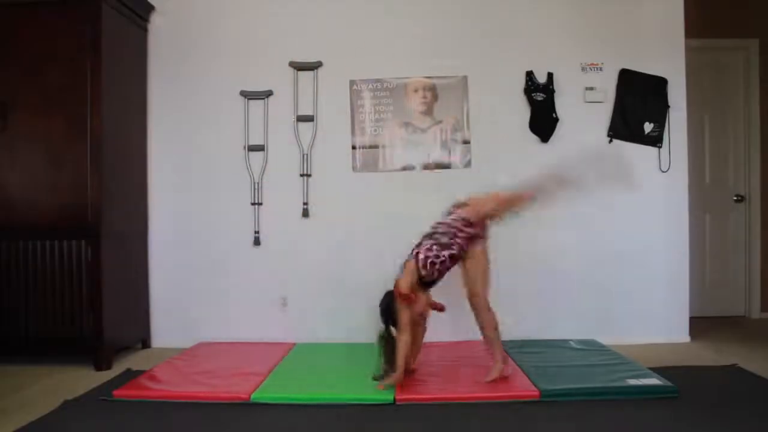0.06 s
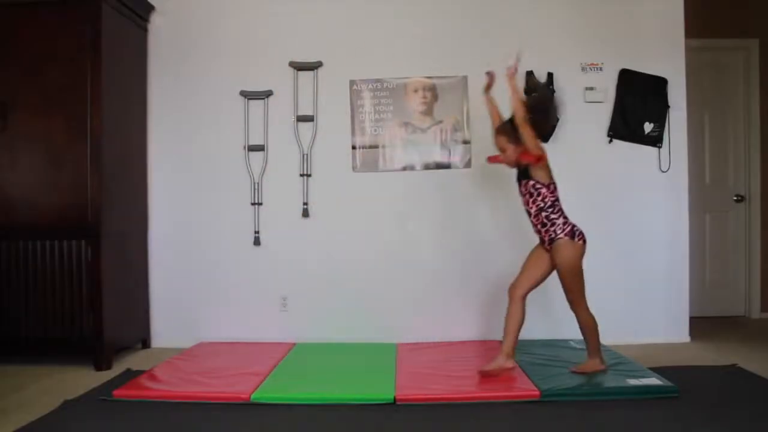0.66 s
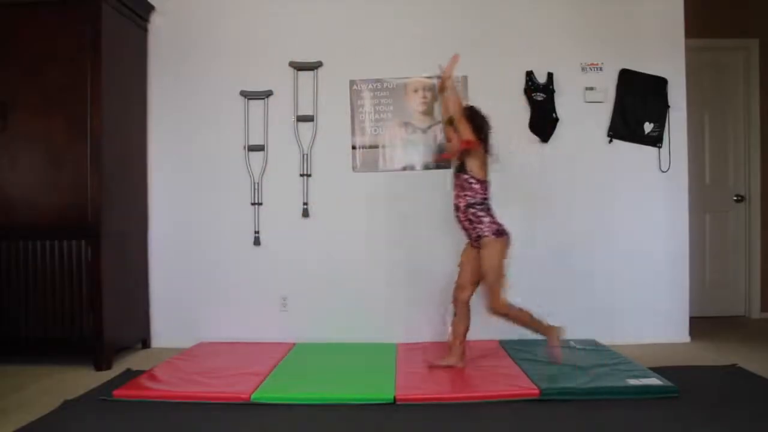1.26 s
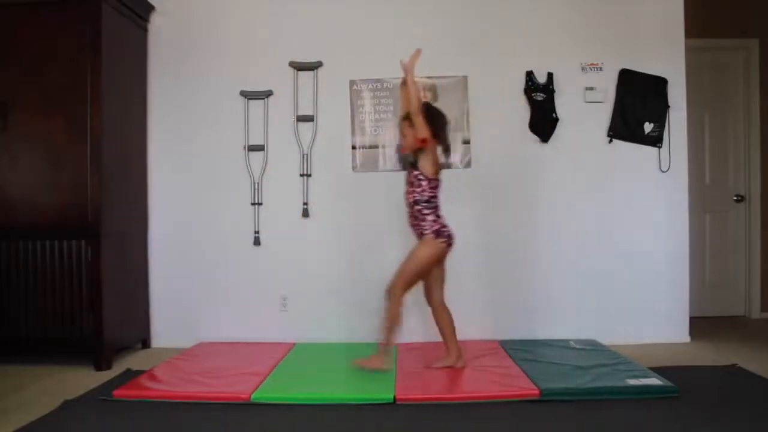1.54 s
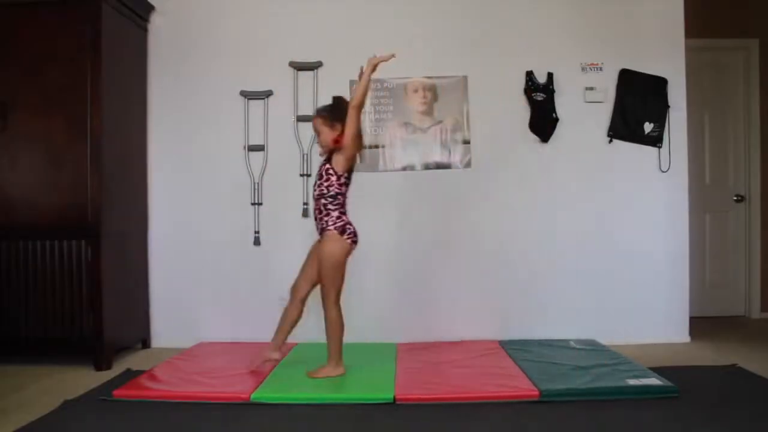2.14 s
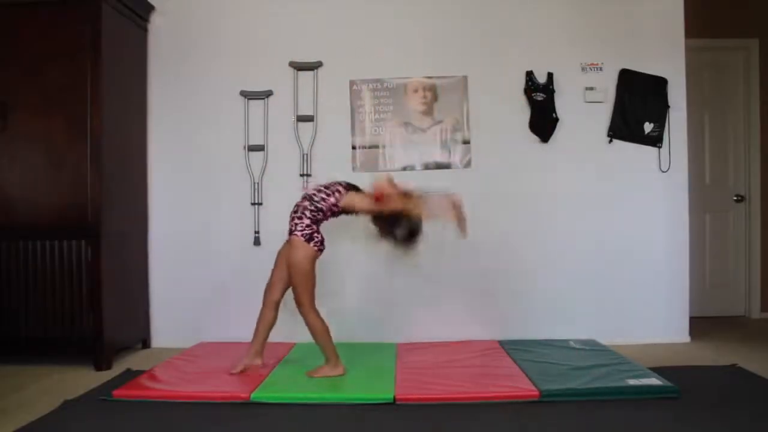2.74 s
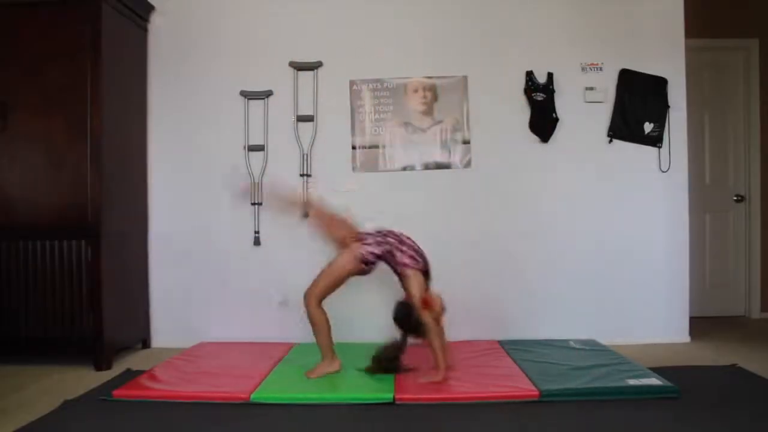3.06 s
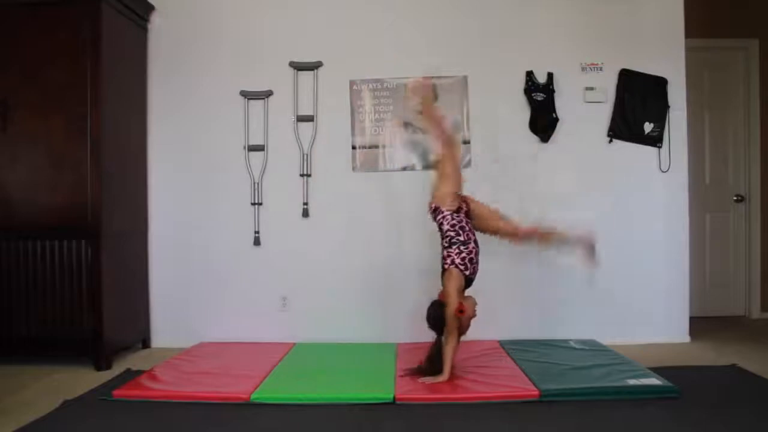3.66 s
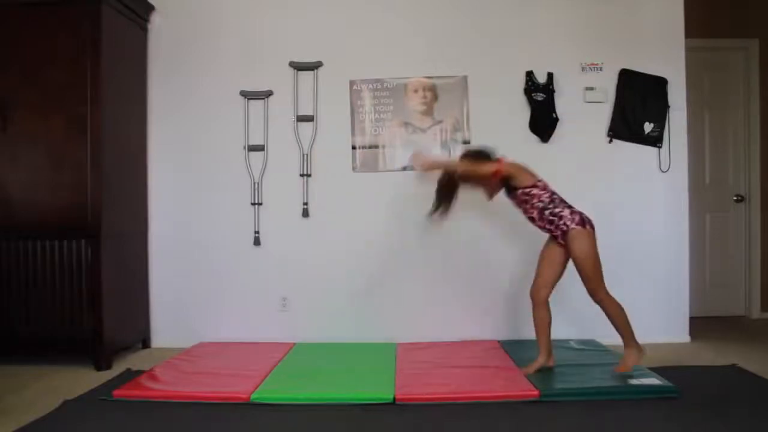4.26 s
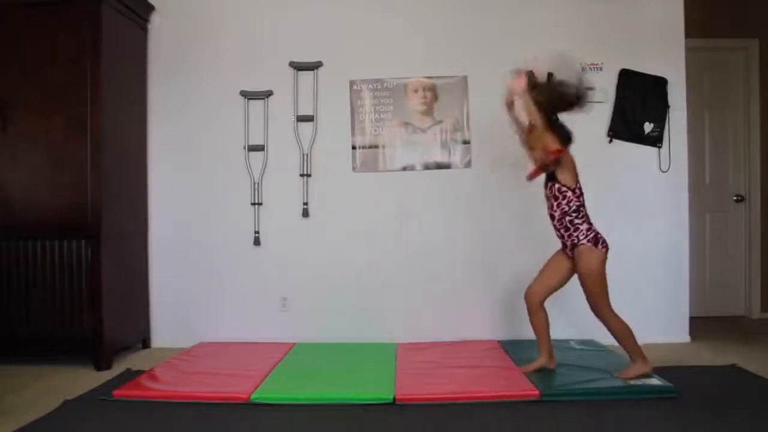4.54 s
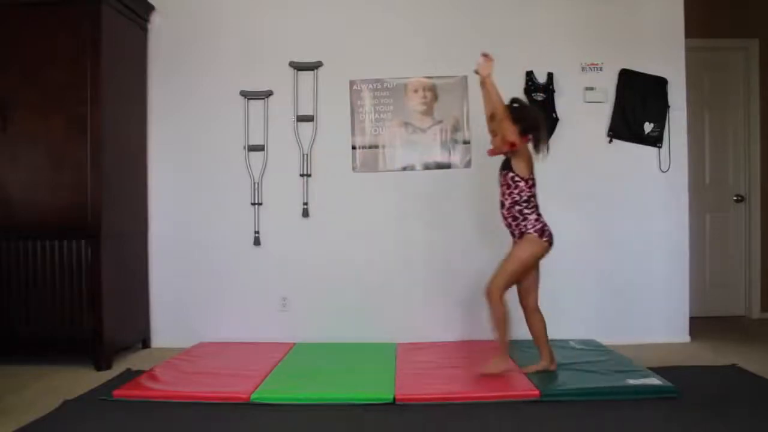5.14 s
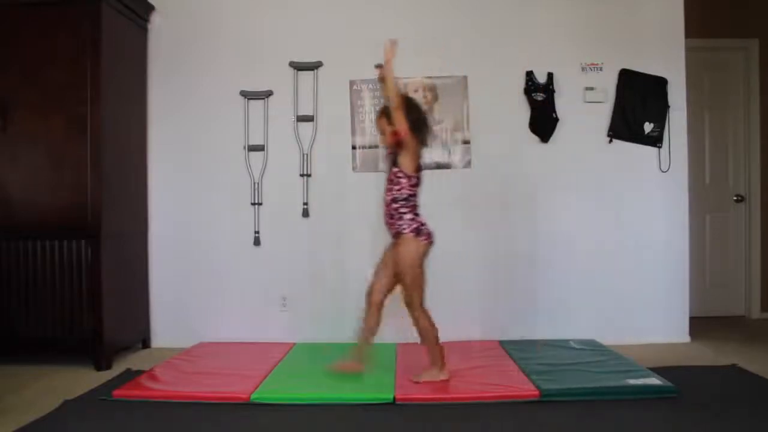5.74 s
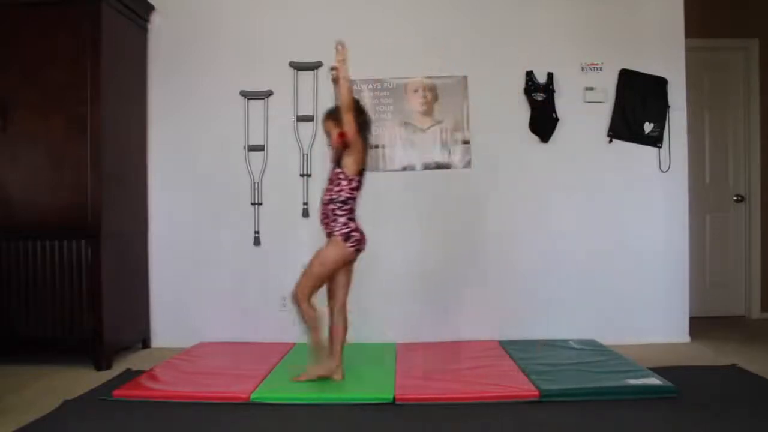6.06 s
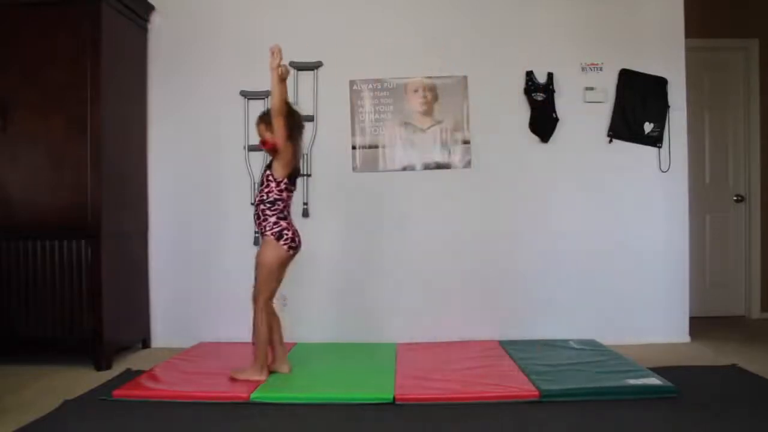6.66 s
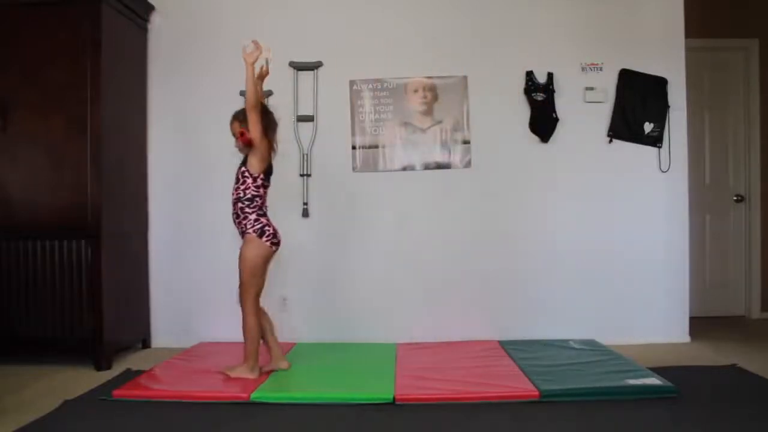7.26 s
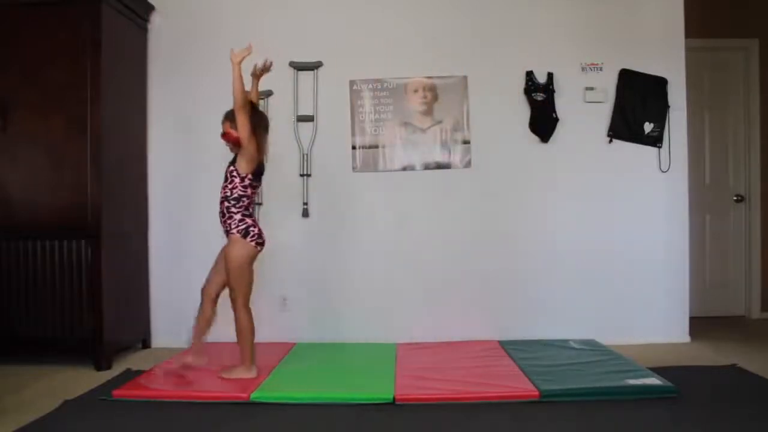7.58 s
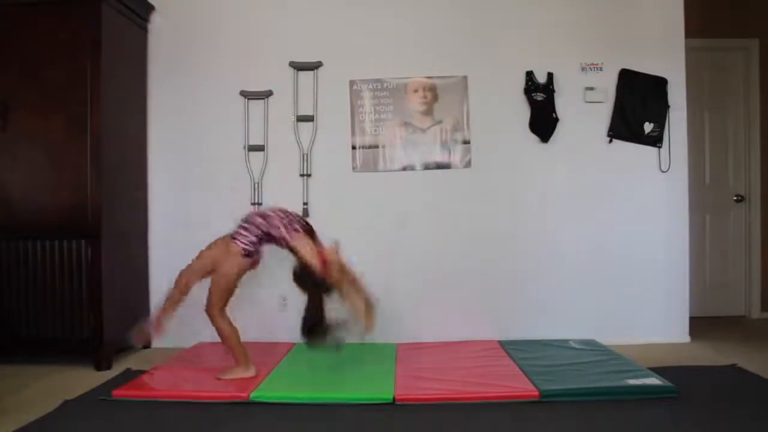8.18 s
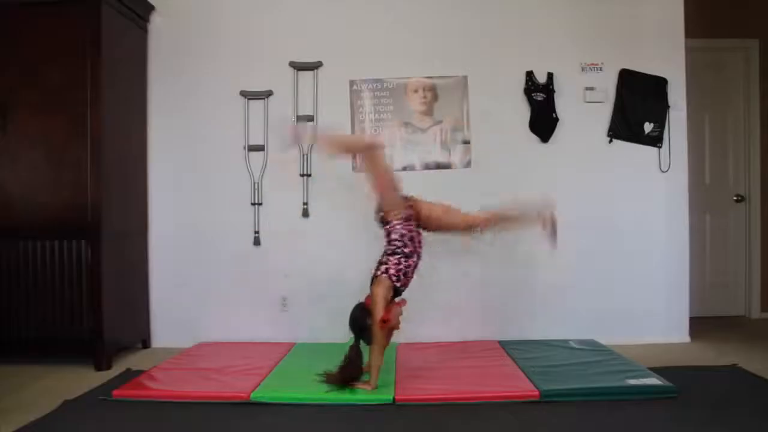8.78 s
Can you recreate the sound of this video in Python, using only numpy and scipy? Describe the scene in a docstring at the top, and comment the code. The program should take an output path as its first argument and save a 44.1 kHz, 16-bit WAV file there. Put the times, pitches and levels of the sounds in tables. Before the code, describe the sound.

A gymnast lands and steps on gym mats in a slightly echoing room, with soft thuds, skin brushing vinyl and one loud smack.

```python
"""A gymnast does walkovers on vinyl-covered foam mats in a bare room. From the start an appliance hums
faintly under the room's hiss. Hands and feet land in clusters: each impact thuds in the foam, pops out
trapped air, crinkles the cover and brushes it with skin. In between, the weight shifts and skin sweeps
or squeaks over the vinyl. Near 5.9 s a flat sole stamps and the mat booms; lighter steps follow to the
end. The walls reverberate after every contact."""
import sys
import numpy as np
from scipy import signal
from scipy.fft import rfft, irfft, next_fast_len
from scipy.io import wavfile

SR = 44100
rng = np.random.default_rng(int(sys.argv[2]) if len(sys.argv) > 2 else 0)


def file_out(sig):
    """Save sig as 16-bit WAV at sys.argv[1]."""
    # one column per channel
    cols = np.atleast_2d(sig).T
    # limit, then scale
    lim = np.clip(cols, -1, 1)
    pcm = np.round(lim * 32767).astype(np.int16)
    wavfile.write(sys.argv[1], SR, pcm)


N = 392931


def amp(db):
    """Amplitude ratio of a level in decibels."""
    return 10 ** (np.asarray(db) / 20)


def unit(x):
    """Normalisation to an rms of 1."""
    return x / np.sqrt(np.mean(x ** 2) + 1e-20)


def along(points, hz):
    """Interpolation of (frequency, value) points on a logarithmic frequency axis."""
    point_hz, values = np.transpose(points)
    return np.interp(np.log(hz + 1), np.log(point_hz + 1), values)


def wobble(size, knots):
    """Random modulation: straight lines between Gaussian values at evenly spaced knots."""
    values = rng.standard_normal(int(knots) + 2)
    return np.interp(np.linspace(0, knots, size), np.arange(len(values)), values)


def minimum_phase(gain_db):
    """Folding the cepstrum onto positive time gives a causal filter with these gains."""
    cepstrum = irfft(np.maximum(gain_db, -120) * np.log(10) / 20)
    half = len(cepstrum) // 2
    cepstrum[1:half] *= 2
    cepstrum[half + 1:] = 0
    return np.exp(rfft(cepstrum))


def add(track, start_s, sound):
    """Superposition: a sound adds to the track from its start time."""
    start = max(round(start_s * SR), 0)
    part = track[start:start + len(sound)]
    part += sound[:len(part)]


# Spectrum of the room's hiss: frequency_hz, gain_db
HISS_SPECTRUM = [(15, -44), (25, -17), (130, -5.5), (174, -14.5), (228, -12), (291, -14), (425, -14.5),
                 (542, -17), (710, -15), (1040, -18.5), (1150, -17.5), (1390, -19.5), (1930, -20),
                 (7830, -26.5), (15800, -30.5)]
def room_hiss(level_db=-55):
    """Stationary broadband noise, strongest in the bass."""
    gain = amp(along(HISS_SPECTRUM, np.fft.rfftfreq(N, 1 / SR)))
    return amp(level_db) * unit(irfft(rfft(rng.standard_normal(N)) * gain, N))


# Tones of the appliance: pitch_hz, rms_level_db
HUM_TONES = [(70.5, -66), (120, -61.5), (240, -66), (13351, -83)]
def appliance_hum(waver_db=4.5, drift_rad=0.048):
    """Sinusoids under slow, random amplitude and phase modulation."""
    hum, t = np.zeros(N), np.arange(N) / SR
    for pitch_hz, level_db in HUM_TONES:
        peak = np.sqrt(2) * amp(level_db + waver_db * wobble(N, knots=25.7))
        hum += peak * np.sin(2 * np.pi * pitch_hz * t + drift_rad * wobble(N, knots=18.8))
    return hum


# Reverberation time of the bare room: frequency_hz, t60_s
REVERB_TIMES = [(80, 0.41), (250, 0.31), (900, 0.59), (3500, 0.7), (8000, 0.52), (15000, 0.31)]
def reverberate(direct, wet_db=0.0, bass_db=-1, treble_db=-2, gap_s=0.004):
    """Diffuse reflections decay exponentially in each band; each spot on the mat has its own tail."""
    hz, t, noise = signal.stft(rng.standard_normal(SR // 2), SR, nperseg=256)
    t60_s = along(REVERB_TIMES, hz)[:, None]
    colour = amp(wet_db + along([(300, bass_db), (900, 0), (4000, 0), (10000, treble_db)], hz))[:, None]
    equal_energy = np.sqrt(2 * np.log(1000) / (t60_s * SR))
    decay = np.exp(-np.log(1000) * t / t60_s)
    tail = signal.istft(noise * colour * equal_energy * decay, SR, nperseg=256)[1]
    return signal.fftconvolve(direct, np.r_[1, np.zeros(round(gap_s * SR)), tail])


# Skin dragging on vinyl: start_s, length_s, centre_hz, bandwidth_hz, level_db
SKIN_DRAGS = [(1.126, 0.029, 3780, 450, -44.5), (1.261, 0.014, 2800, 400, -49),
              (1.271, 0.039, 5460, 900, -52.5), (3.469, 0.13, 4850, 700, -62),
              (4.62, 0.035, 6350, 600, -54.5), (5.416, 0.12, 2700, 463, -60), (7.722, .01, 7200, 1100, -49),
              (7.721, .01, 10380, 1800, -49)]
def squeaks():
    """Friction under a turning palm or sole makes a thin, narrow-band hiss."""
    track, hz = np.zeros(N), np.fft.rfftfreq(SR, 1 / SR)
    for start_s, length_s, centre_hz, bandwidth_hz, level_db in SKIN_DRAGS:
        resonance = 1 / (1 + (2 * (hz - centre_hz) / bandwidth_hz) ** 2)
        drag = unit(irfft(rfft(rng.standard_normal(SR)) * resonance))
        stroke = signal.windows.tukey(int(length_s * SR), 0.5)
        add(track, start_s, reverberate(amp(level_db) * stroke * drag[:len(stroke)]))
    return track


def burst(pressure, colour_db, grain_db, snap_db=-60, snaps_per_s=220, grains_per_s=2200):
    """Stick-slip excitation: uneven slips and lone snaps follow the pressure and ring a filter."""
    size = len(pressure)
    grains = amp(grain_db * wobble(size, grains_per_s * size / SR))
    snaps = amp(snap_db) * (rng.random(size) < snaps_per_s / SR)  # the sticky cover lets go at once
    slips = rng.standard_normal(size) * (grains + snaps) * pressure
    sound = irfft(rfft(slips) * minimum_phase(colour_db))
    return unit(sound) * np.sqrt(np.mean(pressure ** 2))


# Spectra of foam, trapped air, vinyl cover and skin in a contact: frequency_hz, gain_db
THUD_SPECTRUM = [(30, -31), (60, -2), (95, 0.5), (137, 3.5), (175, -2), (245, 3), (310, -2), (400, -5.5),
                 (600, -24.5), (1500, -39)]
POP_SPECTRUM = [(200, -47), (380, -1), (490, 4.5), (640, -0.5), (800, -0.5), (1100, 0), (1500, -1),
                (1900, -2.5), (3200, -51.5)]
CRINKLE_SPECTRUM = [(900, -30.5), (1600, 1.5), (2000, 2.5), (2600, 0.5), (3400, -1.5), (5000, -2.5),
                    (6400, -9), (9000, -24.5)]
BRUSH_SPECTRUM = [(3500, -51), (6000, -3), (7700, -4), (10500, -0.5), (13000, -1), (14800, -9),
                  (15800, -12)]
def contact(length_s, level_db, weight_db, glance_db, pocket_hz, crease_hz, size=8192):
    """A pressure pulse excites thud, pop, crinkle and brush; weight and glance are relative levels."""
    t, hz = np.arange(size) / SR, np.fft.rfftfreq(size, 1 / SR)
    pressure = np.sin(np.pi * np.minimum(t / length_s, 1) ** 0.51)  # fast rise, slower release

    def octaves_from(centre_hz):
        return np.clip(np.log2((hz + 1) / centre_hz), -2, 2)

    # Weight reaches the foam; a square touch traps air, a glancing one drags the cover.
    thud_db = level_db + weight_db
    pop_db = level_db - 0.5 - 0.17 * glance_db
    crinkle_db = level_db - 0.28 + 0.17 * glance_db
    brush_db = level_db + glance_db
    sliding_db = np.clip(brush_db - crinkle_db + 2, -12, 12)  # a sliding touch is brighter
    quickness = np.clip(np.log2(0.041 / length_s), 0, 1.5)  # a touch under 41 ms drives less deep bass
    foam = along(THUD_SPECTRUM, hz) + 4 * quickness * octaves_from(200)
    air = along(POP_SPECTRUM, hz) - 10 * octaves_from(pocket_hz) ** 2
    vinyl = along(CRINKLE_SPECTRUM, hz) - 3 * octaves_from(crease_hz) ** 2
    skin = along(BRUSH_SPECTRUM, hz) + 0.36 * sliding_db * octaves_from(8000)
    thud = amp(thud_db) * burst(pressure, foam, grain_db=1)
    pop = amp(pop_db) * burst(pressure, air, grain_db=3.5)
    crinkle = amp(crinkle_db) * burst(pressure, vinyl, grain_db=6.5, snap_db=22)
    brush = amp(brush_db) * burst(pressure, skin, grain_db=4, snap_db=23 - sliding_db)
    return reverberate(thud + pop + crinkle + brush)


# Changes of balance: start_s, length_s, level_db, pocket_hz
BALANCE_SHIFTS = [(0.468, 0.033, -50, 1090), (1.031, 0.042, -52, 840), (2.351, .025, -50.5, 1190),
                  (2.395, 0.035, -48, 1100), (2.541, 0.055, -54, 950), (2.7, 0.025, -47.5, 930),
                  (2.827, 0.035, -56, 865), (2.936, 0.026, -55, 510), (4.7116, 0.042, -52, 1020),
                  (4.8956, 0.052, -53.5, 860), (5.416, 0.14, -58.5, 955), (6.3375, 0.027, -52, 705),
                  (7.093, 0.068, -58, 920), (7.174, 0.072, -57, 1100), (8.063, 0.024, -56, 1040),
                  (8.1034, 0.02, -48, 930), (8.811, 0.059, -53, 865)]
def balance_shifts(weight_db=-8, glance_db=-10.5, crease_hz=2500):
    """Compression: the mat gives under a standing foot or hand as the load moves."""
    track = np.zeros(N)
    for start_s, length_s, level_db, pocket_hz in BALANCE_SHIFTS:
        add(track, start_s, contact(length_s, level_db, weight_db, glance_db, pocket_hz, crease_hz))
    return track


# Light strokes on the cover: start_s, length_s, level_db, glance_db
SKIN_SWEEPS = [(0.5486, 0.026, -48.5, 1.5), (0.6615, 0.2, -54, -0.5), (0.8013, 0.038, -53, 3),
               (1.66, 0.1, -55.5, 4), (2.8513, .031, -52, 0.5), (3.8926, 0.039, -49.5, -5),
               (3.918, 0.022, -43.5, -4), (4.479, 0.11, -50, -2.5), (4.618, 0.15, -63.5, 8),
               (4.959, 0.028, -47.5, 1), (5.276, .046, -57.5, 13), (5.8087, 0.048, -54, 11.5),
               (6.136, 0.051, -49, 4), (6.36, 0.052, -51, -0.5), (6.5335, .024, -49, 3),
               (6.8847, 0.037, -48.5, 3), (7.291, .085, -59.5, 6), (7.878, 0.044, -59, 4.5),
               (8.3273, 0.029, -47.5, -1), (8.845, 0.16, -55.5, 3)]
def sweeps(weight_db=-7, pocket_hz=935, crease_hz=3200):
    """Friction and adhesion: skin slides over the cover or peels off it."""
    track = np.zeros(N)
    for start_s, length_s, level_db, glance_db in SKIN_SWEEPS:
        add(track, start_s, contact(length_s, level_db, weight_db, glance_db, pocket_hz, crease_hz))
    return track


# Hands and feet coming down: start_s, length_s, level_db, weight_db, glance_db, pocket_hz, crease_hz
LANDINGS = [(0.1, 0.028, -39.5, 9.5, 0, 770, 2700), (0.115, .04, -34.5, 1, -8, 1000, 2800),
            (0.171, 0.018, -35, -3, -16, 910, 2300), (0.183, 0.017, -32, 2, -8, 1020, 2500),
            (0.566, 0.051, -46.5, -3.5, -9, 870, 2300), (0.721, .017, -38.5, -5, -1.5, 1390, 2040),
            (1.1245, 0.022, -38, -5.5, -2.5, 770, 3900), (1.26, .05, -44.5, -2.5, -9, 1130, 3100),
            (1.696, 0.023, -41, -4, -3, 660, 2860), (1.771, 0.047, -43.5, -4.5, -2, 950, 2500),
            (1.835, 0.039, -43.5, -3, -5.5, 850, 2480), (3.0393, 0.021, -41, -0.5, -11.5, 775, 2300),
            (3.096, 0.028, -39, -4, -2.5, 1070, 3320), (3.109, 0.066, -39, 2, -8, 1030, 2700),
            (3.227, 0.036, -38.5, -6.5, -5, 710, 2490), (3.9365, 0.015, -34.5, 2, -5, 885, 3000),
            (3.953, 0.023, -26.5, 0.5, -7, 855, 2900), (4.0092, 0.017, -26.5, -5, -22, 844, 2500),
            (4.03, 0.023, -32, -10, -3.5, 970, 3000), (4.363, 0.042, -48.5, -1, -4.5, 970, 3470),
            (4.396, .05, -55, 7, -5, 940, 3300), (4.505, .026, -45, -2.5, -10, 1020, 2300),
            (4.7923, 0.019, -44, -5, -4, 1110, 3230), (5.349, 0.073, -51.5, -1, -2, 845, 2800),
            (5.516, 0.027, -42, -4, -6.5, 950, 2540), (5.874, .022, -39.5, -13, -3, 670, 3300),
            (5.918, 0.0031, -21.5, -1, 2.5, 483, 3500), (5.9226, 0.0048, -20, -8, -1.5, 500, 3500),
            (5.939, .03, -44, 6, -14, 734, 3400), (6.405, 0.013, -40, -0.5, -0.5, 616, 2300),
            (6.428, 0.019, -43.5, -13, -32, 880, 2500), (6.548, .022, -41, 0, -1.5, 970, 4000),
            (6.688, .038, -42, 1.5, 5.5, 1060, 4300), (6.842, 0.024, -40, -5.5, -9, 870, 3720),
            (7.349, 0.025, -40, -10, -2, 790, 3300), (7.431, 0.034, -45, -7, -0.5, 980, 2900),
            (7.7474, 0.054, -50.5, -1.5, -2, 860, 2700), (8.164, 0.037, -47.5, -2.5, -2, 1120, 3200),
            (8.282, 0.017, -44.5, -6, -12, 1230, 2280), (8.3522, 0.045, -37.5, 4, -9.5, 960, 2580),
            (8.388, 0.033, -34, 5.5, -5.5, 1050, 2920), (8.483, 0.058, -45.5, -7, -2.5, 990, 2700)]
def steps():
    """Two-stage impact: a hand or foot lands, then the rest of it rolls down, longer and softer."""
    track = np.zeros(N)
    for start_s, length_s, level_db, weight_db, glance_db, pocket_hz, crease_hz in LANDINGS:
        landing = contact(length_s, level_db, weight_db, glance_db, pocket_hz, crease_hz)
        roll = contact(1.41 * length_s, level_db - 8.5, weight_db + 0.5, glance_db - 1,
                       pocket_hz, crease_hz)
        add(track, start_s, landing)
        add(track, start_s + 0.7 * length_s, roll)
    return track


# Modes of the mat on the floor: pitch_hz, level_db, t60_s
MAT_MODES = [(93, -31.5, 0.36), (144, -40, 0.14), (246, -36.5, 0.58), (257, -7, 0.03), (472, -28, 0.07)]
def stamp(start_s=5.9186, clap_db=-7, clap_decay_s=0.00031, boom_rise_s=0.00068):
    """Impulse response: a flat sole claps the air out, then the mat booms in its damped modes."""
    track, direct, t = np.zeros(N), np.zeros(SR // 2), np.arange(SR // 4) / SR
    clap = amp(clap_db) * (1 - t / clap_decay_s) * np.exp(-t / clap_decay_s)
    boom = sum(amp(level_db) * np.sin(2 * np.pi * pitch_hz * t) * np.exp(-np.log(1000) * t / t60_s)
               for pitch_hz, level_db, t60_s in MAT_MODES)
    add(direct, 0.0001, clap)  # heel
    add(direct, 0.0008, clap)  # ball of the foot
    add(direct, 0.0085, boom * (1 - np.exp(-t / boom_rise_s)))
    add(track, start_s, reverberate(direct, wet_db=-0.5, bass_db=-4, treble_db=-5))
    return track


def scene():
    """The pressures of all sources add at one point, a few metres from the gymnast."""
    background = room_hiss() + appliance_hum()
    return (background + squeaks() + balance_shifts() + sweeps() + steps() + stamp())[None]


def record(dry, low_hz=44, top_hz=15850):
    """Band limiting: the deepest bass rolls off and the highest treble is cut away."""
    size = next_fast_len(N + SR // 2)
    highpassed = signal.sosfilt(signal.butter(2, low_hz, "highpass", fs=SR, output="sos"), dry)
    passband = np.fft.rfftfreq(size, 1 / SR) < top_hz
    return irfft(rfft(highpassed, size) * passband, size)[..., :N]


dry = scene()
out = record(dry)
file_out(out)
```